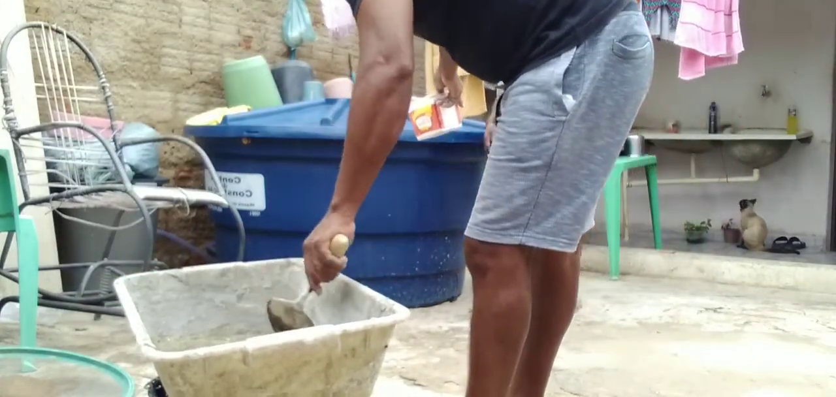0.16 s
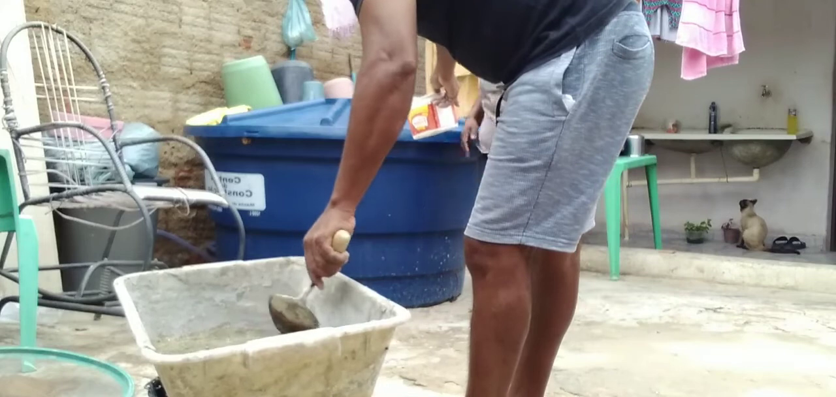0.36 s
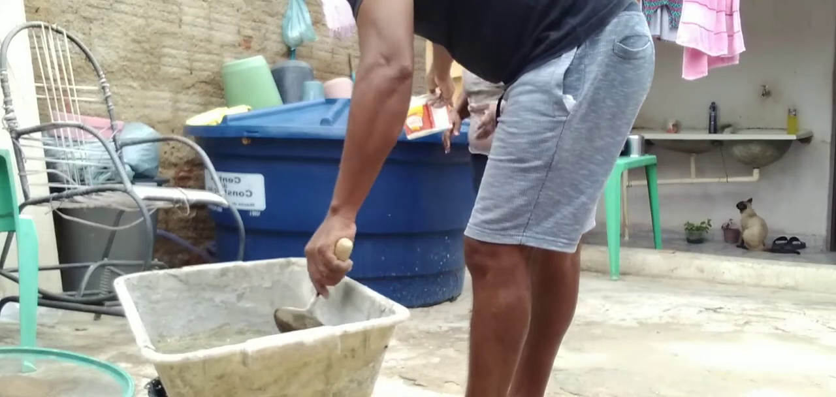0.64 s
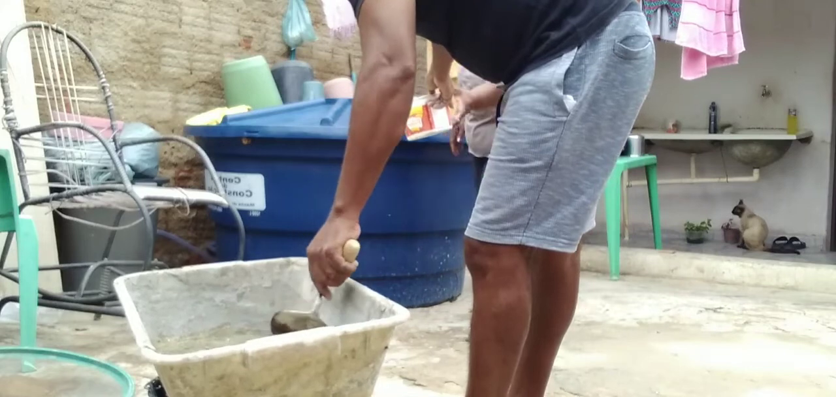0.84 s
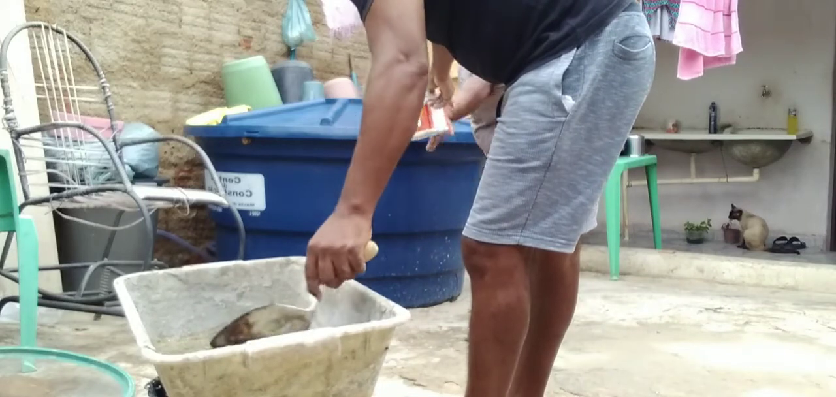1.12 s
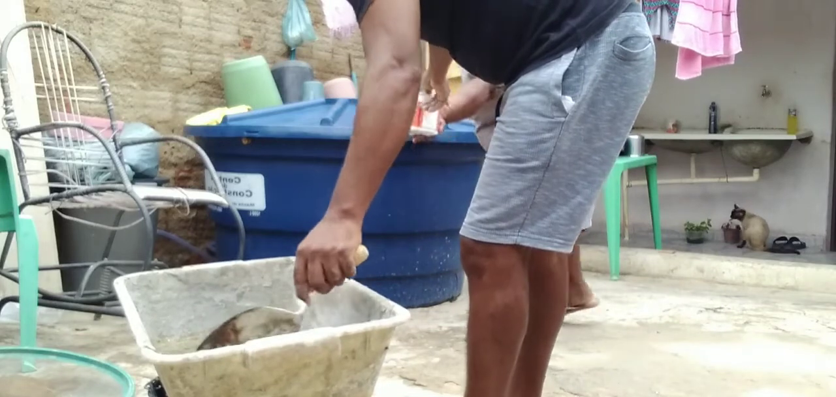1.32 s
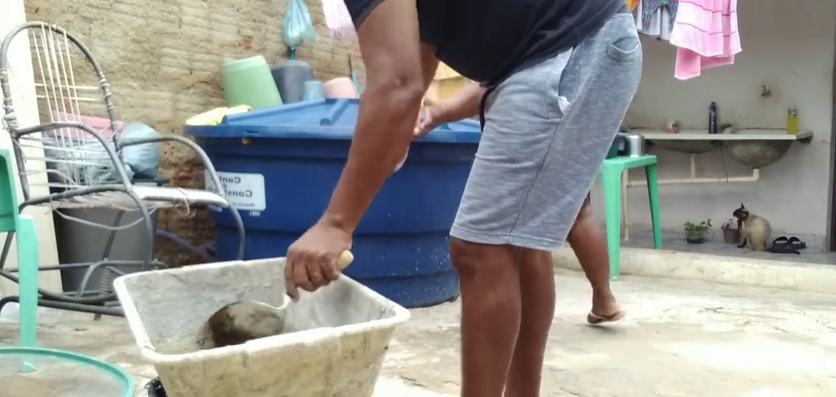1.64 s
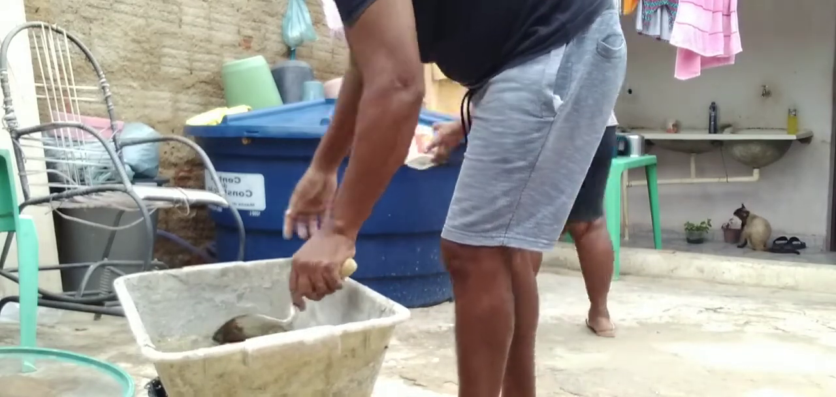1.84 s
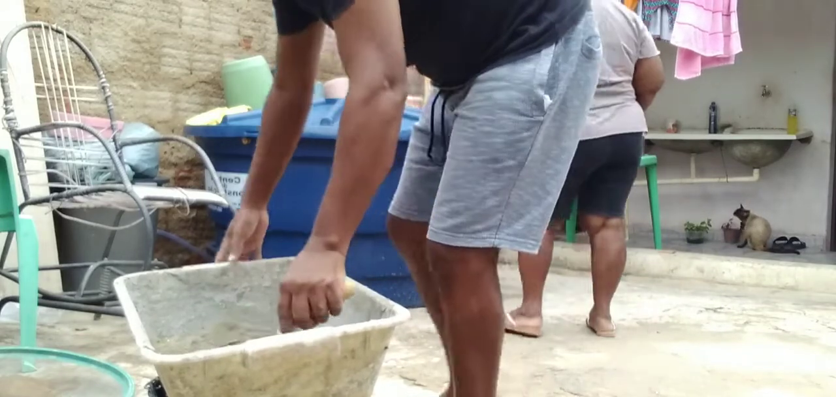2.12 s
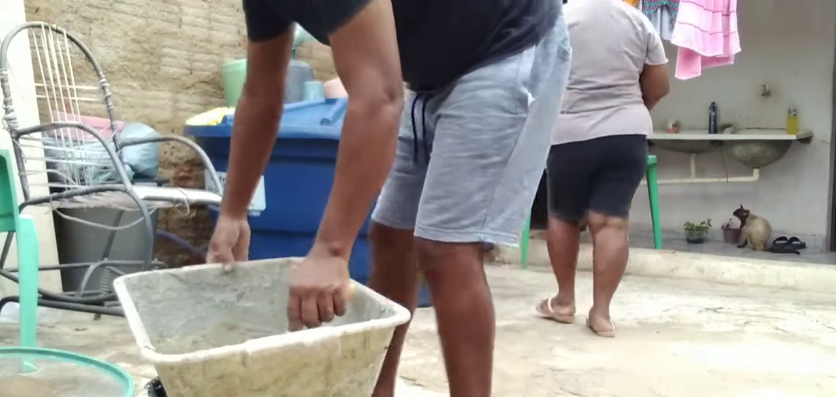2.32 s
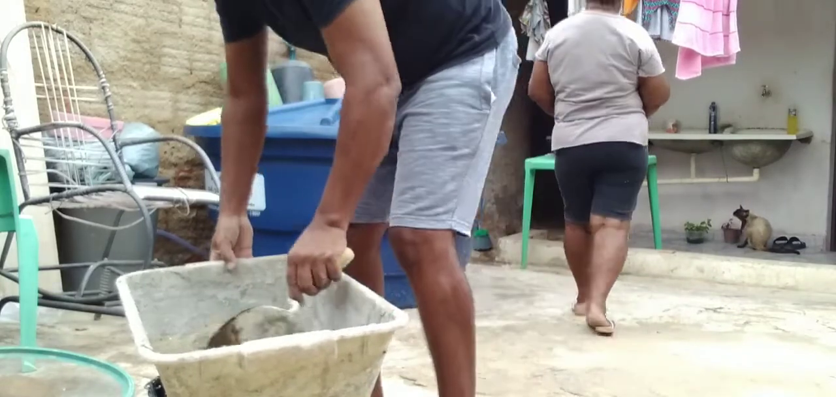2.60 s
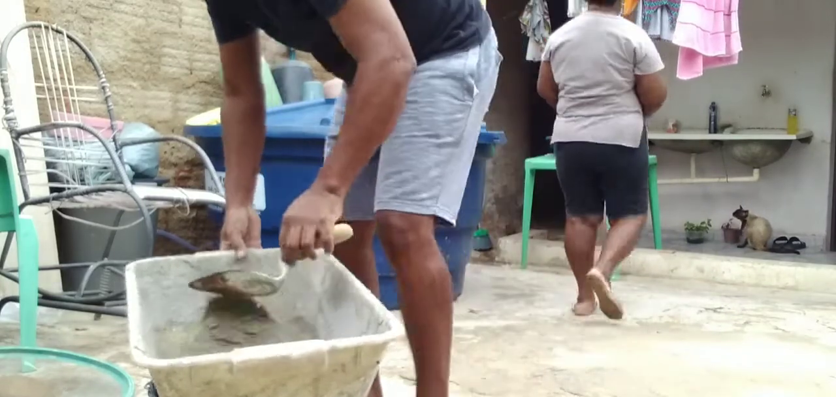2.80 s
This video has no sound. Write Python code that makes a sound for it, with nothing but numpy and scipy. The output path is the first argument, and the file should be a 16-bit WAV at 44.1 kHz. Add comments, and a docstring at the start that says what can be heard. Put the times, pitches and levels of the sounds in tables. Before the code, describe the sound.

Close up in a walled yard, gritty trowel blows crunch and ring over dull tub thuds, a near-quiet gap holds light steel scrapes and faint hum, then a booming knock and rough wet stirring.

```python
"""A small steel trowel chops four times into sandy mortar, scrapes lightly, knocks the plastic tub and stirs.
Sand crunches under each blow and rings the blade and the tub wall; wet mortar booms on the tub floor.
Close echoes in the tub and a diffuse one from the yard walls surround the blade; faint air, a hum and
a whir lie behind. The recorder's noise gate and hiss suppressor darken the pauses."""
import sys
import numpy as np
from scipy import signal
from scipy.fft import rfft, irfft
from scipy.io import wavfile
from scipy.ndimage import uniform_filter1d, map_coordinates

SR = 44100
rng = np.random.default_rng(int(sys.argv[2]) if len(sys.argv) > 2 else 0)


def store_pcm(level_fs):
    """Save levels as 16-bit WAV."""
    pcm = np.round(np.clip(level_fs, -1, 1) * 32767).astype(np.int16)
    wavfile.write(sys.argv[1], SR, np.atleast_2d(pcm).T)


N = 130095
TIME = np.arange(N) / SR  # seconds

# resonances of the plastic tub wall: (frequency [Hz], width [Hz], level [dB])
WALL = [(345, 40, -3.5), (456, 35, -6), (647, 55, -5.5), (765, 60, -4.5), (875, 60, -5.5), (1010, 40, -6)]
# resonances of the crunching sand: (frequency [Hz], width [Hz], level [dB])
CRUNCH = [(1250, 12, 4), (1479, 130, -1), (2120, 74, -4.5), (2400, 40, -4), (3467, 80, -6), (3900, 100, -8),
          (4200, 180, -6)]
# low spectrum of the shaking tub: (frequency [Hz], density [dB per Hz])
RUMBLE = [(25, -25), (45, -22), (75, 0), (130, 1), (220, -11.5), (350, -14), (600, -39), (1200, -61)]
# resonance beds, relative to a 0 dB peak
CRUNCH_BED_DB, WALL_BED_DB = -11, -17.5
# sand under the blows, the scrapes and the slide
GRAINS_PER_S, GRAIN_SPREAD_DB = 9000, 2
# the gate's full cut; the background is raised by as much ahead of it
GATE_DEPTH_DB = 7.5


def amp(db):
    """Decibels to gain."""
    return 10 ** (np.asarray(db) / 20)


def unit(x):
    """Scale to rms 1."""
    return x / np.sqrt(np.mean(x ** 2) + 1e-20)


def colour(x, points, low_hz=15):
    """Shape by (Hz, dB) points, with a steep skirt under low_hz."""
    f = np.fft.rfftfreq(N, 1 / SR) + 0.0008
    hz, db = np.array(points).T
    gain = amp(np.interp(np.log(f), np.log(hz), db))
    skirt = np.sqrt(1 + (low_hz / f) ** 10)
    return unit(irfft(rfft(x) * gain / skirt, N))


def resonate(x, peaks, bed_db, pitch=1):
    """Pass through resonances that stand on a broad bed spanning the same range."""
    f = np.fft.rfftfreq(N, 1 / SR) + 1e-3
    rows = np.array(peaks, float)
    power = amp(2 * bed_db)
    for hz, width, db in rows:
        power = power + amp(2 * db) / (1 + (2 * (f - hz * pitch) / width) ** 2)
    low_skirt = 1 + (0.87 * rows[:, 0].min() / f) ** 10
    high_skirt = 1 + (f / (0.88 * rows[:, 0].max())) ** 10
    return unit(irfft(rfft(x) * np.sqrt(power / (low_skirt * high_skirt)), N))


def decay(t, t60):
    """Fall by 60 dB in t60 seconds, starting at t = 0."""
    return np.exp(-np.log(1000) * np.maximum(t, 0) / max(t60, 1e-3))


def envelope(start, rise, hold, t60):
    """Attack, hold, release."""
    t = TIME - start
    return np.clip(t / max(rise, 1e-4), 0, 1) * decay(t - rise - hold, t60)


def walk(rate):
    """Smooth chance with a spread near 1, drawn at rate points per second and joined by lines."""
    return 1.6 * np.interp(TIME * rate, np.arange(4096), rng.standard_normal(4096))


def background():
    """Faint outdoor air; a wavering hum and a thin, swelling whir join it from the long pause onward."""
    # outdoor air at the microphone: (frequency [Hz], density [dB per Hz])
    air_spectrum = [(25, 0.5), (70, 15.5), (200, 1), (2000, -7.5), (2900, -2), (5000, -5), (7500, 0.5),
                    (12000, -6)]
    air_db = -64  # levels here are as heard with the gate shut
    start_s, hold_s = 1.205, 1.495
    hum_hz, hum_waver, hum_db, hum_flutter_db = 352, .018, -71.5, 3.5
    whir_hz, whir_start_db, swell_db_per_s = 1168, -80.5, 10

    hum_phase = 2 * np.pi * np.cumsum(hum_hz * (1 + hum_waver * walk(39.24))) / SR
    hum = np.sqrt(2) * np.sin(hum_phase) * amp(hum_db + hum_flutter_db * walk(18))
    whir = resonate(rng.standard_normal(N), [(whir_hz, 60, 0)], bed_db=-40)
    whir *= amp(whir_start_db + swell_db_per_s * (TIME - start_s))
    air = amp(air_db + 2 * walk(8.6)) * colour(rng.standard_normal(N), air_spectrum)
    on = envelope(start_s, 0.067, hold_s, 0.28)
    return amp(GATE_DEPTH_DB) * (air + on * (hum + whir))


def grit(rate, spread_db):
    """Sand grains of unequal size, crushed in jerks as the blade sticks and slips under a steady push."""
    jerks_per_s, jerk_db = 113.04, 2.5
    hit = rng.random(N) < rate / SR
    size = amp(spread_db * np.minimum(rng.exponential(size=N), 4))
    sign = np.sign(rng.standard_normal(N))
    grains = hit * size * sign * amp(jerk_db * walk(jerks_per_s))
    # even out the level over 16 ms
    return grains / np.sqrt(np.abs(uniform_filter1d(grains ** 2, size=700)) + 1e-3)


def blade(force):
    """The steel plate rings on after the grains that strike it, each mode a decaying sine."""
    # ringing modes of the plate: (frequency [Hz], level [dB], t60 [s])
    blade_modes = [(4250, -16, .22), (4950, -14, .18), (5900, -12, .2), (6890, -8, .16), (7147, -7, .18),
                   (7995, -8, .18), (8390, -7, .16), (8777, -2, .12)]
    t = np.arange(SR // 2) / SR
    ring = np.zeros(len(t))
    for hz, db, t60 in blade_modes:
        ring += amp(db) * np.sin(2 * np.pi * hz * t) * decay(t, t60) / np.sqrt(t60)
    ring /= np.linalg.norm(ring)
    return amp(-11) * signal.fftconvolve(force, ring)[:N]


def blows():
    """Each blow crushes a burst of sand, which shakes the blade and the tub wall."""
    # blows of the blade, levels relative: (time [s], rise [s], hold [s], fall t60 [s],
    # sand hiss [dB], crunch [dB], tub wall [dB])
    blow_table = [(0.082, 0.004, 0.02, 0.16, -38, -40.5, -39),
                  (0.1, 0.0018, 0.022, 0.025, -26.5, -35.5, -43.5),
                  (0.159, 0.0026, 0.0038, 0.11, -36, -48, -62),
                  (0.327, 0.00053, 0.021, 0.067, -52, -62.5, -47),
                  (0.345, 0.0073, 0.0052, 0.13, -17.5, -30, -28.5),
                  (0.372, 0.0022, 0.0058, 0.18, -66, -42, -41.5),
                  (0.575, 0.0078, 0.0062, 0.13, -16, -22.5, -27),
                  (.598, 0.004, 0.0087, 0.041, -31, -40, -39),
                  (0.643, 0.0018, 0.0046, 0.21, -38.5, -37, -39.5),
                  (0.795, 0.0046, 0.0017, 0.18, -20.5, -26, -28.5),
                  (2.104, 0.0016, 0.0046, 0.1, -24.5, -37.5, -39),
                  (2.186, 0.0058, 0.0066, 0.059, -36, -29, -40),
                  (2.23, 0.0031, 0.002, 0.058, -16, -23, -15.5),
                  (2.242, 0.0022, 0.0022, 0.19, -29, -30, -19.5),
                  (2.276, 0.0028, 0.0021, 0.17, -35.5, -60, -28.5),
                  (2.326, 0.0023, 0.0048, 0.13, -39.5, -34.5, -36),
                  (2.4, 0.0021, 0.0062, 0.23, -37, -37, -32),
                  (2.485, 0.0046, 0.0022, 0.071, -31.5, -37.5, -32),
                  (2.6, 0.00085, 0.0021, 0.044, -46, -38.5, -50),
                  (2.656, 0.0056, 0.027, 0.039, -29, -53, -94),
                  (2.742, 0.002, 0.0011, 0.013, -21, -68, -66.5)]
    # hiss of the crushed sand: (frequency [Hz], density [dB per Hz])
    sand_spectrum = [(1760, -37), (3000, -15), (4660, -12), (5800, -7.5), (6300, -6), (8530, 0.5),
                     (9390, -4), (15500, -10.5)]

    hiss, crunch, wall = np.zeros((3, N))
    for start, rise, hold, t60, hiss_db, crunch_db, wall_db in blow_table:
        push = envelope(start, rise, hold, t60)
        hiss += amp(hiss_db) * push
        crunch += amp(crunch_db) * push
        wall += amp(wall_db) * push
    grains = grit(GRAINS_PER_S, GRAIN_SPREAD_DB)
    sand = hiss * colour(grains, sand_spectrum, low_hz=3800) + blade(hiss * grains)
    body = crunch * resonate(grains, CRUNCH, CRUNCH_BED_DB)
    body += wall * resonate(grains, WALL, WALL_BED_DB)
    return amp(-1.5) * sand + amp(-1.31) * body


def thuds():
    """The tub floor booms with gliding pitch under the mortar, then shudders, most after deep thuds."""
    # thuds of mortar on the tub floor: (time [s], level [dB], starting pitch [Hz],
    # sag [octaves per s, negative rises], rise [s], t60 [s])
    thud_table = [(0.092, -33, 243, 6.5, 0.0018, 0.17), (0.217, -26, 208, 24, 0.00091, 0.051),
                  (0.228, -28, 155.6, 13, 0.012, 0.1), (0.35, -26, 238, -2.5, 0.013, 0.089),
                  (0.468, -26.5, 181, -4, 0.0032, 0.035), (.482, -30.5, 160, 22.5, 0.0077, 0.12),
                  (0.582, -19.5, 236.5, 2, 0.0058, 0.14), (0.691, -32.5, 171.7, 10, 0.0079, 0.34),
                  (.798, -22.5, 224.4, -2.5, 0.0089, 0.063), (0.955, -43.5, 89.6, 8, 0.016, 0.11),
                  (1.963, -37, 69, 5, 0.0058, 0.087), (2.232, -18, 326, 3, 0.01, 0.043),
                  (2.255, -13, 215.4, 3, 0.0099, 0.18), (2.321, -30, 160.4, 1.5, 0.017, 0.21),
                  (2.417, -22, 226.5, 2.5, 0.0067, 0.18), (2.484, -20.5, 222, -4.5, 0.012, 0.029),
                  (2.555, -34, 104, 29, 0.0053, 0.22), (2.599, -20.5, 97.5, 9.5, 0.0042, 0.31),
                  (2.602, -28, 182, 2.5, 0.0019, 0.15), (2.654, -32, 106.4, 1, 0.023, 0.3),
                  (2.674, -28, 206.4, -5.5, 0.0072, 0.052), (2.778, -21.5, 125.5, 8, 0.002, 0.27),
                  (2.776, -30, 245, 30, 0.00071, 0.097), (2.819, -33.5, 83.6, 4.5, 0.007, 0.48)]
    shudder_db, shudder_t60_s = -11.5, 0.54
    shudder_hz = 123  # thuds above this shake the tub less

    boom, shudder = np.zeros((2, N))
    for start, db, hz, sag, rise, t60 in thud_table:
        age = np.maximum(TIME - start, 0)
        pitch = hz * 2 ** (-sag * np.minimum(age, .12))  # steady after 0.12 s
        phase = np.cumsum((age > 0) * pitch) / SR
        boom += amp(db) * np.sqrt(2) * np.sin(2 * np.pi * phase) * envelope(start, rise, 0, t60)
        depth = min(shudder_hz / hz, 1) ** 2
        shudder += amp(db) * depth * envelope(start, rise, 0, shudder_t60_s)
    return boom + amp(shudder_db) * shudder * colour(rng.standard_normal(N), RUMBLE)


def tub(x):
    """Four close reflections inside the tub colour the sound, their delays wandering slightly."""
    echo_s, echo_gain, drift_s = .004, .3, .00006
    lags = [echo_s * (.5 + share) + drift_s * walk(10) for share in rng.random(size=4)]
    echoes = sum(map_coordinates(x, [np.arange(N) - lag * SR]) for lag in lags)
    return (x + echo_gain * echoes) / np.sqrt(1 + len(lags) * echo_gain ** 2)


def yard(x):
    """Diffuse echo from the walls of the yard: decaying coloured noise that sets in after 24 ms."""
    noise = colour(rng.standard_normal(N), [(100, 6.0), (1500, -1), (8000, -1.5), (15000, -4)])
    echo = noise * envelope(0.024, 0.0033, 0, t60=0.43)
    return signal.fftconvolve(x, echo / np.linalg.norm(echo))[:N]


def scrapes():
    """The edge slides lightly over sand and sings in its resonances, pitched anew for each contact."""
    # scrapes of the steel edge: (time [s], length [s], starting level [dB], fade [dB per s], pitch factor [1])
    scrape_table = [(1.375, 0.03, -50.5, 61, 1.04), (1.419, 0.072, -35.5, 111, 0.99),
                    (1.729, 0.027, -34.5, 134.5, 0.97), (1.832, 0.019, -52.5, 80, 1.04),
                    (1.962, 0.06, -40, 50, .91), (2.189, 0.055, -35.5, -2, 0.85)]
    # resonances of the steel edge: (frequency [Hz], width [Hz], level [dB])
    edge_peaks = [(781, 26, -21), (1220, 30, -14), (1431, 26, -6), (2943, 24, -6.5), (3940, 83, -18),
                  (5380, 310, -16), (6870, 85, -8), (8500, 106, 3.5), (10010, 270, -6), (11620, 150, -10.5),
                  (14570, 270, -6)]
    rise_s, fall_t60_s = 0.0095, 0.029

    out = np.zeros(N)
    grains = grit(GRAINS_PER_S, GRAIN_SPREAD_DB)
    for start, length, db, fade_db, pitch in scrape_table:
        level = amp(db - fade_db * np.clip(TIME - start, 0, length))
        push = envelope(start, rise_s, length, fall_t60_s) * level
        out += push * resonate(grains, edge_peaks, -47, pitch)
    return out


def stones():
    """Small stones tick against the steel, each with its own short ring."""
    stones_per_s, middle_hz, ring_t60_s = 260, 2960, .014
    t = np.arange(SR // 20) / SR
    out = np.zeros(N + len(t))
    for when, place, size in rng.random((int(stones_per_s * N / SR), 3)):
        at = int(when * N)
        hz = middle_hz * 3 ** (2 * place - 1)  # a third to three times the middle
        out[at:at + len(t)] += size ** 2 * np.sin(2 * np.pi * hz * t) * decay(t, ring_t60_s)
    return unit(out[:N])


def stirring():
    """Grains of more unequal size and stones drag under the blade while the tub rumbles."""
    # stirring through the mix: (time [s], sand hiss [dB], crunch [dB], tub rumble [dB])
    stir_table = [(1.79, -57, -78, -60), (1.96, -63, -84, -53), (2.031, -32, -79, -65),
                  (2.09, -40.5, -61, -46.5), (2.17, -82, -48.5, -37.5), (2.29, -43, -37, -45),
                  (2.38, -44.5, -55, -52), (2.45, -39, -46, -36), (2.53, -40, -55, -43),
                  (2.628, -45.5, -53.5, -35.5), (2.709, -32, -63.5, -50), (2.772, -41.5, -60, -41),
                  (2.83, -85, -67.5, -59), (2.939, -84, -98, -39)]
    # hiss of the wet sand: (frequency [Hz], density [dB per Hz])
    wet_spectrum = [(3000, -19.5), (5200, -3.5), (7000, -5.5), (8200, 3), (10000, -5.5), (11500, -19),
                    (15000, -3.5)]

    times, *levels = np.array(stir_table).T
    hiss, crunch, rumble = (amp(np.interp(TIME, times, db, left=-120)) for db in levels)
    grains = grit(7900, spread_db=4.5)
    ticks = amp(-2) * stones()
    wall = amp(-7.5) * resonate(grains, WALL, WALL_BED_DB)
    body = resonate(grains, CRUNCH, CRUNCH_BED_DB) + wall + ticks
    sand = colour(grains + ticks, wet_spectrum, low_hz=3200)
    return hiss * sand + crunch * body + rumble * colour(rng.standard_normal(N), RUMBLE)


def slide():
    """A stroke down the tub wall: the hiss of the sand falls in pitch as the blade sinks in."""
    start_s, length_s, level_db = 2.015, .076, -44
    from_hz, to_hz, width_hz = 6800, 3300, 1400
    hz = np.interp(TIME, [start_s, start_s + length_s], [from_hz, to_hz])
    lowpass = signal.butter(2, width_hz / 2, fs=SR, output="sos")
    band = signal.sosfilt(lowpass, grit(GRAINS_PER_S, GRAIN_SPREAD_DB))
    # the carrier lifts the low band to the falling centre frequency
    hiss = unit(band * np.cos(2 * np.pi * np.cumsum(hz) / SR))
    return amp(level_db) * hiss * envelope(start_s, length_s / 10, length_s / 2, 2 * length_s)


def clink():
    """A pebble rings the pressed blade just before the hard knock: equal sines die away together."""
    # modes of the pressed blade: (frequency [Hz])
    clink_modes = [2096, 2700, 3580, 4600]
    start_s, mode_db, t60_s = 2.19, -34.5, 0.056
    ring = sum(np.sin(2 * np.pi * hz * TIME) for hz in clink_modes)
    return amp(mode_db) * ring * envelope(start_s, t60_s / 20, 0, t60_s)


def gate(x):
    """Turn the sound down whenever its smoothed level has just been low."""
    threshold_db, knee_db, window_s = -50.5, 3, 0.005
    pole = np.exp(-1 / (window_s * SR))
    power = signal.lfilter([1 - pole], [1, -pole], x ** 2)
    level_db = 10 * np.log10(power + 1e-12)
    shut = .5 - .5 * np.tanh((level_db - threshold_db) / knee_db)
    return x * amp(-GATE_DEPTH_DB * shut)


def suppress(x):
    """Turn down each narrow band while it is faint, leaving patches of hiss."""
    threshold_db, depth_db, knee_db = -84, 9, 2
    bands = signal.stft(x, nperseg=512)[2]
    power = np.abs(uniform_filter1d(np.abs(bands) ** 2, size=7, axis=1))  # smoothed over time
    level_db = 10 * np.log10(power + 1e-20)
    shut = .5 - .5 * np.tanh((level_db - threshold_db) / knee_db)
    return signal.istft(bands * amp(-depth_db * shut))[1][:N]


def scene():
    """Trowel and tub in the yard, over the background."""
    sand = tub(blows() + stirring()) + clink()
    low = thuds()
    edge = scrapes() + slide()
    echo = yard(amp(-15.5) * sand + amp(-15.5) * low + amp(-15.0) * edge)
    return (sand + low + edge + echo + background())[None]


def record(dry):
    """A noise gate and a hiss suppressor darken the pauses; a steep filter cuts the top above 15.45 kHz."""
    top_cut = signal.ellip(10, .2, 80, 15450, fs=SR, output="sos")
    return signal.sosfilt(top_cut, suppress(gate(dry[0])))[None]


dry = scene()
out = record(dry)
store_pcm(out)
```